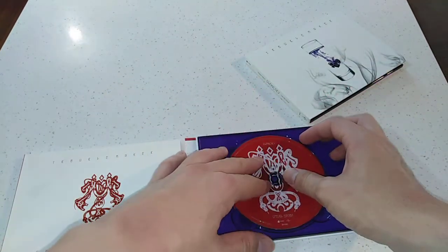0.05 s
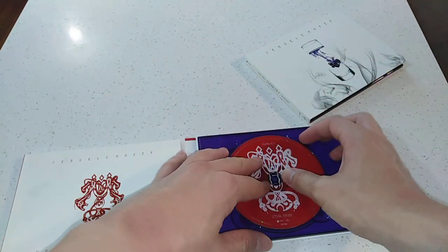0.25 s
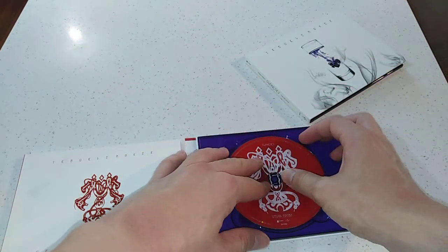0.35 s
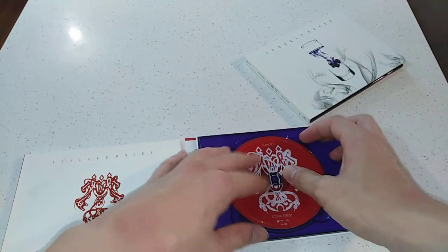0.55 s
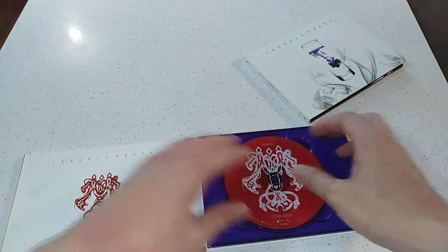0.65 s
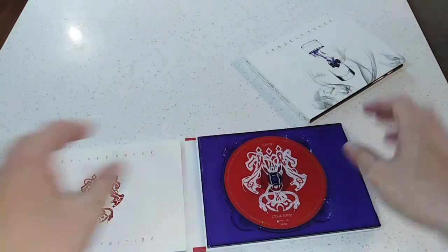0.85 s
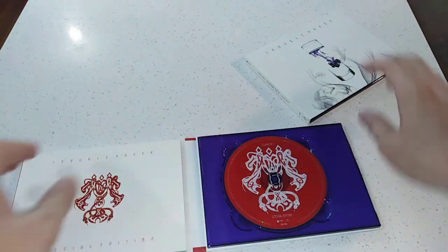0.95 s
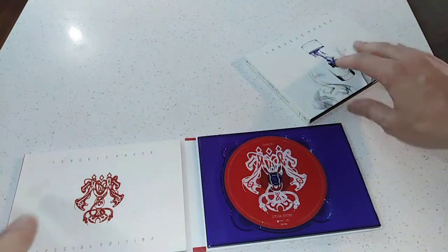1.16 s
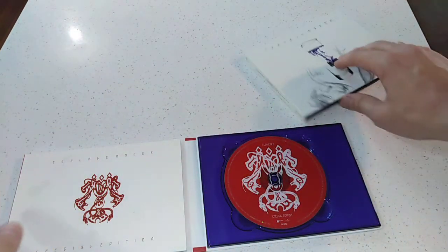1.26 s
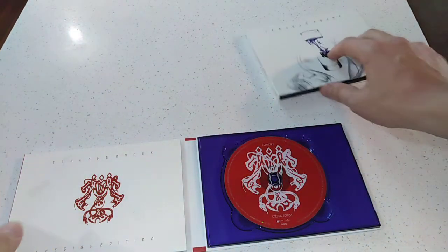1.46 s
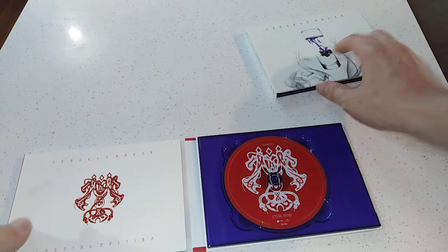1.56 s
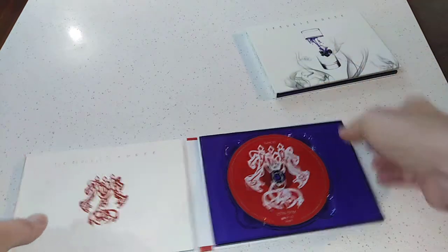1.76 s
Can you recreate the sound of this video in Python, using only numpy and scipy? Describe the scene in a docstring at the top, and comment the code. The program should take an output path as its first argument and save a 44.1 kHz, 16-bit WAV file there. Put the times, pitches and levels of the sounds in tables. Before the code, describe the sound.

Close by in an echoing room, a disc is pressed into a plastic tray with small clicks and one loud snap. Afterwards fingers tick faintly on the plastic, and a cardboard case slides softly over the table.

```python
"""At a table in a hard, echoing room, a disc is pressed onto the hub of a plastic tray.
The hub's teeth catch with small clicks, then the disc snaps home, rings and sets the room ringing.
Fingers tick on the tray as they lift, tap a second, cardboard case and slide it over the table.
Under it all lie thin squeaks, a low room rumble and a faint whine."""
import sys
import numpy as np
from scipy import signal
from scipy.fft import rfft, irfft
from scipy.io import wavfile
from scipy.ndimage import uniform_filter1d, minimum_filter1d

SR = 44100
rng = np.random.default_rng(int(sys.argv[2]) if len(sys.argv) > 2 else 0)


def unload_wav(signal):
    """Save mono or channel-first audio to the path in sys.argv[1] as 16-bit WAV at rate SR, clipped to [-1, 1]."""
    wavfile.write(
        sys.argv[1],
        SR,
        np.round(np.clip(np.atleast_2d(signal).T, -1, 1) * 32767).astype(np.int16),
    )


N = 79380
TIME = np.arange(N) / SR


# In all tables, pan_db above 0 means left. In note and echo tables, fade_s is the time to die away by 60 dB; in
# crack tables (snaps, teeth, bends, ticks) a crack falls about 15 dB by fade_s.
SNAPS = [(0.3361, -38.5, .006, -1), (0.3383, -22.5, 0.007, -0.5), (0.3397, -6, 0.028, 0.5),
         (0.3441, -12, 0.05, -4)]
# Their tone: pitch_hz, gain_db
SNAP_TONE = [(60, -45), (150, -16.5), (220, -15), (290, -23), (400, -12), (520, -20), (620, -13),
             (720, -9.5), (1020, -13.5), (1330, 3.5), (1650, -2.5), (2200, 1.5), (3700, 2), (4700, -1.5),
             (6500, -1.5), (11000, -4), (15000, -10)]
def disc_snap():
    """The disc jumps past the teeth and lands in the tray."""
    return clicks(SNAPS, SNAP_TONE)


# Notes of disc and tray together: pitch_hz, level_db, fade_s
DISC_NOTES = [(1364, 0.5, 0.075), (2004, -1.5, .07), (2254, -1, .07), (2376, -5, .1), (2610, -7, .16),
              (3118, -10.5, .06), (3300, -4.5, 0.12), (3404, -2.5, .07), (3681, 2.5, .08), (3794, -3.5, .1),
              (6040, -5.5, 0.07), (7000, -5.5, .16), (9650, -3, 0.083), (10800, -8.5, .14)]
def disc_ring():
    """The hardest crack of the snap sets disc and tray ringing."""
    start_s, level_db = max(SNAPS, key=lambda row: row[1])[:2]
    return ringing(DISC_NOTES, start_s, level_db - 4)


# Clicks of the teeth: start_s, level_db, fade_s, pan_db
CATCHES = [(0.2050, -44.5, 0.011, 0), (0.2063, -25, 0.0072, -0.5), (0.2085, -36, .02, -0.5),
           (0.2114, -30, 0.043, -4.5), (0.2124, -27.5, 0.019, 1.5), (0.2155, -30, 0.09, -5)]
# Their tone: pitch_hz, gain_db
CATCH_TONE = [(100, -29), (190, -31.5), (300, -22), (500, -25), (900, -15.5), (1400, -11), (2230, -7),
              (3500, -2.5), (4540, -6.5), (5700, -2.5), (7500, -8.5), (10100, -13.5), (14500, -16)]
# Clicks of the bending tray: start_s, level_db, fade_s, pan_db
BENDS = [(0.2068, -31.5, 0.023, -0.5), (0.2135, -28, .06, -1), (0.2243, -36.5, .03, -0.5),
         (0.2273, -36, .025, 0.5)]
# Their tone: pitch_hz, gain_db
BEND_TONE = [(100, -26), (200, -27), (280, -12.5), (480, -19), (900, -11), (1300, -9), (1700, -5.5),
             (2300, 1), (3400, -0.5), (5000, -13), (14000, -22.5)]
def teeth_catch():
    """The teeth catch the rim of the disc's hole, and the tray bends under them."""
    return clicks(CATCHES, CATCH_TONE) + clicks(BENDS, BEND_TONE)


# Notes of the tray: pitch_hz, level_db, fade_s
TRAY_NOTES = [(265.9, -8, 0.076), (576, -3.5, 0.1), (1086, 0, .05), (2140, 3.5, 0.051), (3230, 3, .06)]
def tray_ring():
    """The tray rings as the teeth catch."""
    return ringing(TRAY_NOTES, start_s=0.23, level_db=-38)


# Notes of the loose disc: pitch_hz, level_db, fade_s
LOOSE_NOTES = [(1460, 0, .25), (2000, -3.5, 0.27), (2445, -1, .3), (2927, -2.5, .25), (3500, -10, .15),
               (5290, -7, .18)]
def loose_disc():
    """The loose disc hums under the first touch."""
    return ringing(LOOSE_NOTES, start_s=0.028, level_db=-61.5)


# Ticks: start_s, level_db, rise_s, fade_s, ring_hz, ring_db
TICKS = [(0.026, -57, 0.0021, .03, 1570, -7), (0.687, -46, 0.0054, 0.062, 1600, 2),
         (0.724, -47.5, 0.0031, 0.034, 1900, -12), (0.7286, -44, 0.0028, 0.065, 2080, -10.5)]
# Their tone: pitch_hz, gain_db
TICK_TONE = [(100, -28), (700, -28), (1200, -8), (2200, 4.5), (3300, -2), (7000, -9), (10000, -12.5),
             (14000, -22.5)]
def finger_ticks(ring_width_hz=160):
    """Fingers tick softly on the tray, and each tick rings briefly at one pitch."""
    out = np.zeros((2, N))
    decay = np.exp(-np.pi * ring_width_hz / SR)
    for start_s, level_db, rise_s, fade_s, ring_hz, ring_db in TICKS:
        tick = crack(fade_s, TICK_TONE, rise_s)
        feedback = [1, -2 * decay * np.cos(2 * np.pi * ring_hz / SR), decay ** 2]
        note = amp(ring_db) * unit_hit(signal.lfilter([1], feedback, tick))
        add(out, start_s, amp(level_db) * pan(-2.5) * unit_hit(tick + note))
    return out


# Tone of the tap: pitch_hz, gain_db
TAP_TONE = [(100, -21), (200, -6), (330, -4), (520, -12), (700, -6), (880, -37), (1200, -6.5), (2000, -3),
            (2700, 5.5), (3300, -5), (3900, 3.5), (6000, -1), (8800, -13.5), (11000, -5.5), (12500, -31),
            (14500, -36)]
def case_tap(start_s=1.2727):
    """A fingertip lands on the cardboard case: one low thud and a sharp tap."""
    out = ringing([(345.2, 0, 0.049)], start_s, level_db=-54)
    add(out, start_s, amp(-45) * pan(-1) * crack(fade_s=0.022, tone=TAP_TONE))
    return out


# Loudness of the slide: time_s, body_db, hiss_db
SLIDE_LEVELS = [(1.285, -65, -69), (1.305, -66.5, -58), (1.342, -56.5, -51), (1.374, -53.5, -55),
                (1.404, -65, -65), (1.435, -58, -61), (1.466, -58.5, -58.5), (1.484, -66.5, -67.5),
                (1.495, -61, -63), (1.53, -67.5, -70.5), (1.57, -81, -74), (1.62, -100, -88)]
# Tone of the case's body: pitch_hz, gain_db
BODY_TONE = [(100, -28.5), (350, -40), (750, -16), (1050, -5.5), (1350, 0.5), (1900, 0.5), (2700, -7),
             (4000, -40), (15000, -54)]
# Tone of the hiss: pitch_hz, gain_db
HISS_TONE = [(100, -35), (1500, -31), (2800, -1.5), (5500, 1.5), (8000, -3.5), (11000, -7.5),
             (14500, -18.5)]
def case_slide(slips_per_s=7000, spread_db=0.5):
    """Tiny slips of card on the table sound through the case and as a hiss."""
    time_s, body_db, hiss_db = np.transpose(SLIDE_LEVELS)
    slips = rng.random(N) < slips_per_s / SR
    strength = amp(spread_db * np.minimum(rng.exponential(1, N), 4))
    grains = stereo_noise(N, LIKENESS) * slips * strength
    body = unit(shape_tone(grains, BODY_TONE)) * amp(np.interp(TIME, time_s, body_db, -140, -140))
    hiss = unit(shape_tone(grains, HISS_TONE)) * amp(np.interp(TIME, time_s, hiss_db, -140, -140))
    return pan(-3) * (body + hiss)


# Rubs: start_s, length_s, level_db, pitch_hz, width_octaves, pan_db
BRUSHES = [(-0.03, .08, -66, 3000, 1.1, -3), (0.013, 0.14, -74.5, 2195, .4, -0.5),
           (0.945, 0.047, -78, 6030, 0.15, 20), (0.956, 0.098, -84, 6340, 0.28, 14),
           (1.001, .09, -78, 334, 0.21, 4), (1.275, 0.099, -65, 402, 0.67, 9),
           (1.77, 0.064, -58.5, 8570, 1.04, -6), (1.772, 0.055, -72, 2183, 0.81, -6)]
def skin_brushes():
    """Skin brushes card and table in light rubs that swell and fade."""
    out = np.zeros((2, N))
    for start_s, length_s, level_db, pitch_hz, width_octaves, pan_db in BRUSHES:
        swell = np.hanning(round(length_s * SR))
        rub = noise_band(pitch_hz, width_octaves)[:, :len(swell)]
        add(out, start_s, amp(level_db) * pan(pan_db) * swell * rub)
    return out


# Squeaks: start_s, length_s, level_db, pitch_hz
SQUEAKS = [(0.738, 0.22, -79, 3758), (0.942, .31, -77.5, 1987), (0.944, .2, -82.5, 1680),
           (0.98, 0.3, -83.5, 3254), (1.51, 0.17, -78.5, 3780)]
def squeaks():
    """Very narrow bands of noise make faint, wavering tones."""
    out = np.zeros((2, N))
    for start_s, length_s, level_db, pitch_hz in SQUEAKS:
        swell = signal.windows.tukey(round(length_s * SR), 0.18)
        squeak = noise_band(pitch_hz, width_octaves=0.031)[:, :len(swell)]
        add(out, start_s, amp(level_db) * swell * squeak)
    return out


# How long the echo lasts: pitch_hz, fade_s
ROOM_FADE = [(140, 0.59), (300, 0.3), (700, 0.62), (1400, .57), (2800, 0.57), (5000, .49), (8000, .47),
             (14000, .39)]
# Its tone: pitch_hz, gain_db
ROOM_TONE = [(70, 2), (150, 7.5), (300, 3), (600, 1.5), (740, 0.5), (1400, -3.5), (2800, -1), (6000, -0.5),
             (14000, -5)]
def room_echo(sound, delay_s=0.0026, build_s=0.0057):
    """The hard room adds a smooth tail of echoes, different at each microphone."""
    hz, t, spectrum = signal.stft(rng.standard_normal((2, SR)), SR, nperseg=256)
    fade = amp(-60 * t / value_at(ROOM_FADE, hz)[:, None])
    tail = signal.istft(spectrum * fade, SR, nperseg=256)[1][:, :SR]
    tail *= np.clip((TIME[:SR] - delay_s) / build_s, 0, 1)
    tail = shape_tone(tail / np.linalg.norm(tail[0]), ROOM_TONE)
    return signal.fftconvolve(sound, tail, axes=1)[:, :N]


# Tone of the rumble: pitch_hz, gain_db
RUMBLE_TONE = [(20, -32), (38, -25.5), (58, -2), (85, -3), (120, -8.5), (160, -13.5), (210, -29),
               (350, -28), (550, -33), (1000, -32.5), (4000, -37.5), (14000, -44.5)]
# Its loudness: time_s, level_db
RUMBLE_LEVELS = [(0, -60.5), (.3, -66.5), (.4, -62), (.6, -55.5), (.8, -64), (1.2, -65), (1.52, -64.5),
                 (1.65, -72.5), (1.8, -76.5)]
def rumble():
    """A low rumble, stronger while the hands press on the table."""
    noise = stereo_noise(N, likeness=[(1, 0.66)])  # equally alike at every pitch
    return unit(shape_tone(noise, RUMBLE_TONE)) * amp(np.interp(TIME, *np.transpose(RUMBLE_LEVELS)))


def whine(pitch_hz=5755, level_db=-79.5, start_s=1.03, rise_s=0.052):
    """One thin, high tone fades in and stays."""
    return amp(level_db) * np.sin(2 * np.pi * pitch_hz * TIME) * np.clip((TIME - start_s) / rise_s, 0, 1)


# How alike the direct sound is at the two microphones: pitch_hz, likeness_0_to_1
LIKENESS = [(100, 0.6), (1300, .85), (2500, 0.4), (5000, 0.6), (14000, 0.05)]
def crack(fade_s, tone, rise_s=0.0009, count=8192):
    """A blow on a thin plate: many close notes that die almost at once."""
    t = TIME[:count]
    fade = np.minimum(t / rise_s, 1) * amp(-60 * t / fade_s)
    spectrum = rfft(stereo_noise(count, LIKENESS) * fade)
    even = irfft(spectrum / (abs(spectrum) + 1e-12), count)  # every pitch equally strong
    return unit_hit(shape_tone(even * fade ** 0.25, tone))


def clicks(rows, tone):
    """A quick run of plastic cracks."""
    out = np.zeros((2, N))
    for start_s, level_db, fade_s, pan_db in rows:
        add(out, start_s, amp(level_db) * pan(pan_db) * crack(fade_s, tone))
    return out


def ringing(notes, start_s, level_db, count=22050):
    """A struck object's fading notes reach the two microphones out of step."""
    t, ring = TIME[:count], 0
    for hz, db, fade_s in notes:
        phase = rng.random() + (rng.random((2, 1)) - 0.5) * (1 - value_at(LIKENESS, hz))
        ring = ring + amp(db - 60 * t / fade_s) * np.sin(2 * np.pi * (hz * t + phase))
    out = np.zeros((2, N))
    add(out, start_s, amp(level_db) * unit_hit(ring))
    return out


def stereo_noise(count, likeness):
    """Noise at two microphones, partly alike."""
    left, other = rfft(rng.standard_normal((2, count)))
    same = np.clip(value_at(likeness, np.fft.rfftfreq(count, 1 / SR)), -1, 1)
    return irfft(np.array([left, same * left + np.sqrt(1 - same ** 2) * other]), count)


def noise_band(pitch_hz, width_octaves):
    """Noise gathered around one pitch."""
    away = np.log2((np.fft.rfftfreq(N, 1 / SR) + 1) / pitch_hz) / width_octaves
    return unit(irfft(rfft(stereo_noise(N, LIKENESS)) * np.exp(-away ** 2 / 2), N))


def shape_tone(x, tone, size=4096):
    """Turns each pitch up or down by a tone table, adding no sound ahead of a hit."""
    log_gain = np.log(amp(value_at(tone, abs(np.fft.fftfreq(size, 1 / SR)))))
    response = np.fft.ifft(np.exp(np.conj(signal.hilbert(log_gain)))).real[:size // 2]
    return signal.fftconvolve(x, response.reshape((1,) * (x.ndim - 1) + (-1,)))[..., :x.shape[-1]]


def value_at(table, hz):
    """Looks up a pitch in a table, blending between rows."""
    pitches, values = np.transpose(table)
    return np.interp(np.log(hz + 1), np.log(pitches), values)


def amp(db):
    """Decibels to gain."""
    return 10 ** (np.asarray(db) / 20)


def unit(x):
    """Scales to an average (rms) level of 1."""
    return x / np.sqrt(np.mean(x ** 2) + 1e-20)


def unit_hit(x, window_s=0.01):
    """Gives a hit the energy of a level-1 sound lasting window_s."""
    return unit(x) * np.sqrt(window_s * SR / x.shape[-1])


def pan(db):
    """Left and right gains."""
    return amp([[db / 2], [-db / 2]])


def add(mix, start_s, sound):
    """Adds a stereo sound at a time."""
    start = round(start_s * SR)
    sound = sound[:, max(-start, 0):]
    part = mix[:, max(start, 0):][:, :sound.shape[1]]
    part += sound[:, :part.shape[1]]


def scene():
    """All sources together; the handling sounds also echo in the room."""
    sources = [  # sound, echo_db
        (teeth_catch(), -10),
        (disc_snap(), -4),
        (tray_ring() + disc_ring() + loose_disc(), -12),
        (finger_ticks() + case_tap(), -14),
        (case_slide() + skin_brushes(), -8),
    ]
    direct = sum(sound for sound, _ in sources)
    echo = room_echo(sum(amp(echo_db) * sound for sound, echo_db in sources))
    return direct + echo + squeaks() + rumble() + whine()


def limit_peaks(x, window_s=0.004):
    """Briefly turns both sides down when a peak would pass full scale."""
    size = round(window_s * SR)
    allowed = np.minimum(1 / (abs(x).max(0) + 1e-9), 1)
    return x * uniform_filter1d(minimum_filter1d(allowed, size), size)


# What counts as quiet in each narrow band: pitch_hz, threshold_db
QUIET_BELOW = [(100, -110), (230, -84.5), (500, -80.5), (800, -78), (1300, -86), (3000, -88.5),
               (7000, -97.5), (14000, -103)]
def suppress_noise(x, depth_db=-7.5, size=512):
    """Turns down each band while it is quiet."""
    hz, _, spectrum = signal.stft(x, SR, nperseg=size)
    power = (abs(spectrum) ** 2).mean(0)
    power = uniform_filter1d(uniform_filter1d(power, 3, axis=0), 3, axis=1)
    passed = power ** 2 / (power ** 2 + amp(value_at(QUIET_BELOW, hz))[:, None] ** 4)
    return signal.istft(spectrum * amp(depth_db * (1 - passed)), SR, nperseg=size)[1][:, :N]


# Tone of each microphone: pitch_hz, gain_db
LEFT_TONE = [(100, 0.5), (700, -1), (2000, -3), (4500, -2.5), (7500, 1), (10000, -6), (14000, -17)]
RIGHT_TONE = [(100, -1), (700, -1.5), (2000, -1), (4500, -5), (7500, -1), (10000, 2), (14000, 0.5)]
def record(dry, lowest_hz=50, highest_hz=14350):
    """Two microphones, the left duller; then peaks, deep bass, noise and top treble are cut back."""
    heard = limit_peaks(np.array([shape_tone(dry[0], LEFT_TONE), shape_tone(dry[1], RIGHT_TONE)]))
    bass_cut = signal.butter(4, lowest_hz, "high", fs=SR, output="sos")
    heard = suppress_noise(signal.sosfilt(bass_cut, heard))
    treble_cut = signal.firwin(255, highest_hz, window=("kaiser", 8), fs=SR)
    return signal.oaconvolve(heard, treble_cut[None], "same")


dry = scene()
out = record(dry)
unload_wav(out)
```